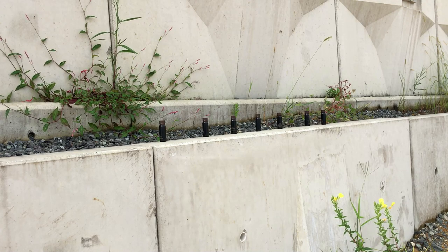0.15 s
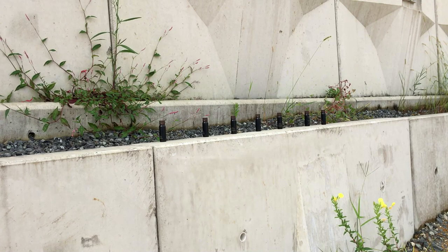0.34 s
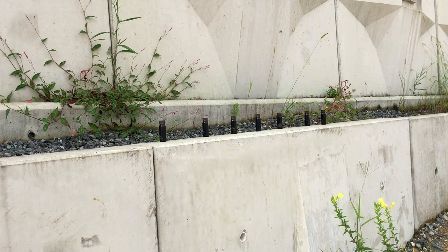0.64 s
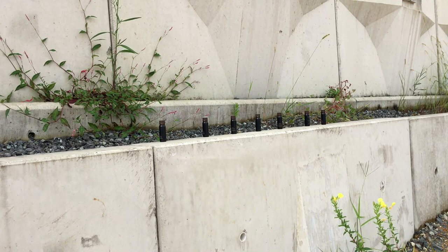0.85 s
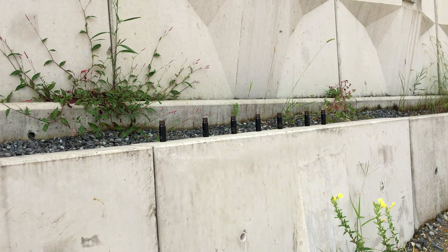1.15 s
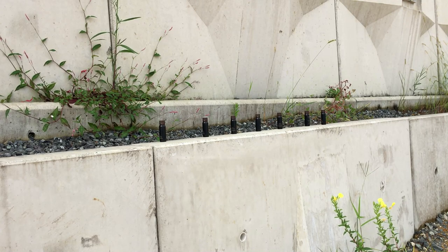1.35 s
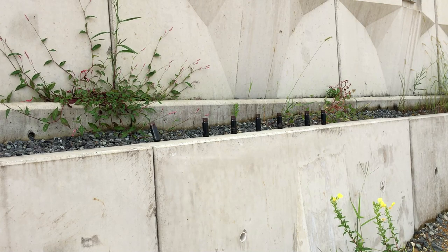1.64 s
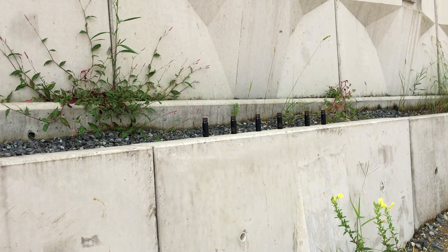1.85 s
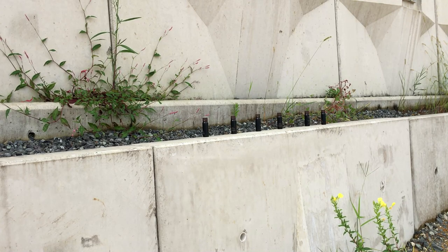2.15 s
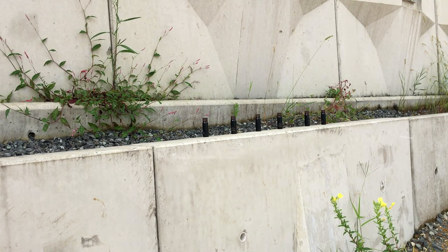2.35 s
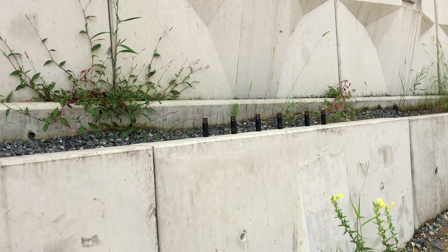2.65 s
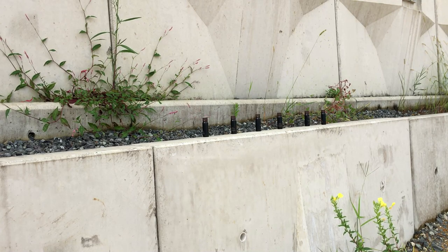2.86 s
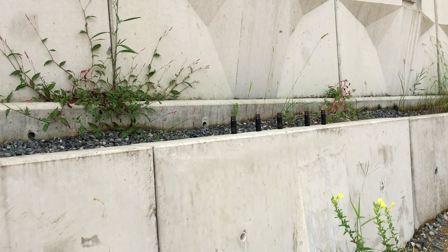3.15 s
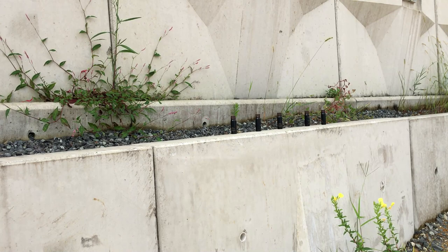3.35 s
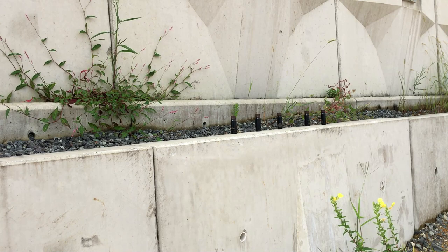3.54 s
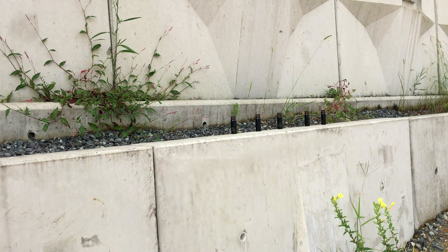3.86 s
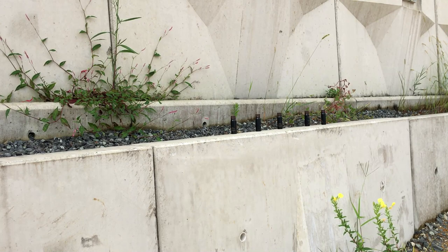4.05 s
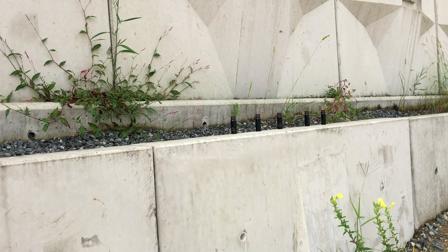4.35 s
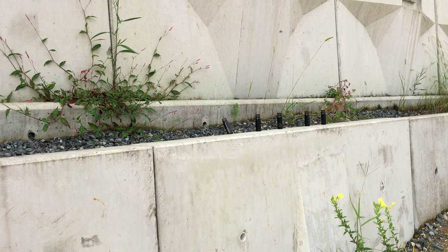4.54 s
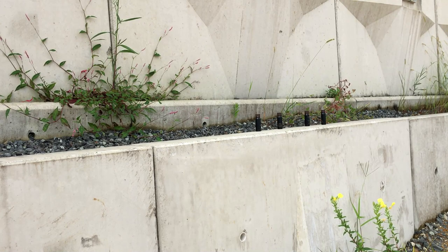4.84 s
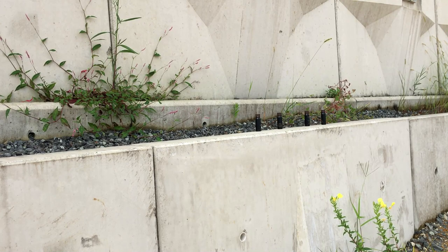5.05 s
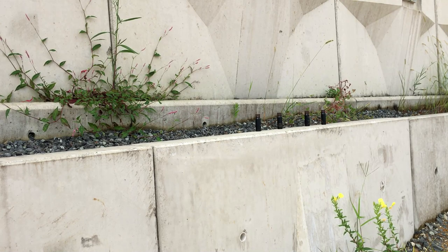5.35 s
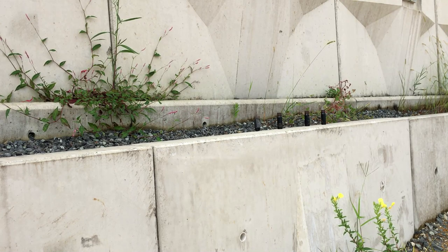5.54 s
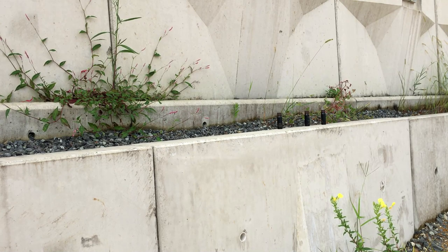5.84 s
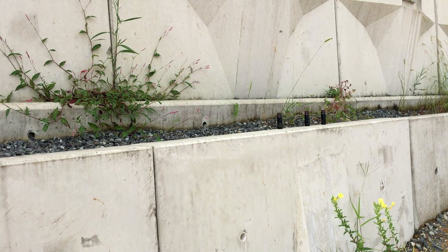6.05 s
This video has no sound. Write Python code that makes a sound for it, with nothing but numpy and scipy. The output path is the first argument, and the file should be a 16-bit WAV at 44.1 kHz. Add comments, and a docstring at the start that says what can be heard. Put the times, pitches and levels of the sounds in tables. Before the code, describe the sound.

An electric airsoft gun fires quick whirring, clacking shots outdoors, its pellets snapping on concrete and knocking small targets into gravel.

```python
"""An electric airsoft gun, some metres off, fires at small targets on a concrete ledge near the microphone.
A target is struck at once, over a low outdoor rumble. In each shot that follows, gears whirr, the piston
slams and the action clacks; about 0.13 s after the slam a BB snaps on concrete or rings a target, which
topples into gravel. Around 2 s a bird trills twice over a distant flock. Near the end a breeze puffs
on the microphone, a bird whistles and the gun fires once more."""
import sys
import numpy as np
from scipy import signal
from scipy.fft import rfft, irfft
from scipy.io import wavfile

SR = 44100
rng = np.random.default_rng(int(sys.argv[2]) if len(sys.argv) > 2 else 0)


def to_wav(s):
    """Save 16-bit WAV."""
    ch = np.atleast_2d(s).T  # columns
    pcm = np.round(np.clip(ch, -1, 1) * 32767)  # PCM
    wavfile.write(sys.argv[1], SR, pcm.astype(np.int16))


N = 273420
T = np.arange(N) / SR

# shots: (time of the slam [s], motor run beforehand [s])
SHOT_TIMES = [(-.069, .05), (.951, .07), (1.2704, .07), (1.5062, .07), (2.387, .048), (2.785, .055),
              (2.985, .052), (3.6408, .06), (4.021, .048), (4.4449, .036), (4.652, .052), (5.2298, .068),
              (5.4358, .056), (6.179, .056)]
# blows within one slam: (delay [s], level [dB], t60 [s])
PISTON_BLOWS = [(.0003, -2.5, 0.057), (.0066, 4, 0.034), (.0095, 4.5, 0.027), (0.0146, 5, 0.053),
                (0.0194, 1.5, .03), (.0255, 1.5, 0.049)]
# spectrum of the slam: (frequency [Hz], level [dB])
PISTON_SPECTRUM = [(100, -38.5), (260, -4.5), (550, -10.5), (1000, -1.5), (1700, -5), (2400, 3), (2950, -7),
                   (3500, 2.5), (5000, -7.5), (6500, -7.5), (7800, -15), (9500, -9), (10500, -20),
                   (12000, -11.5), (16000, -27.5)]
def piston_slams(slam_db=-32.4):
    """Impact excitation: the spring-driven piston slams home in a run of blows, equally hard each shot."""
    slams = [(s, slam_db) for s, _ in SHOT_TIMES]
    return rattle(slams, PISTON_BLOWS, PISTON_SPECTRUM, alike=.87, jitter_s=.0002)


# clacks of the action: (time [s], level [dB])
ACTION_CLACKS = [(0.881, -30.5), (1.204, -29.5), (1.4226, -29.5), (1.687, -30.5), (2.502, -30),
                 (2.9034, -29.5), (3.106, -30.5), (3.7485, -29.5), (4.122, -30.5), (4.566, -30.5),
                 (4.7766, -29.5), (5.3564, -29), (5.562, -31.5)]
# blows within one clack: (delay [s], level [dB], t60 [s])
ACTION_BLOWS = [(.0006, -3, 0.028), (.0035, -3, 0.042), (.0085, 0, .032), (.015, -7, 0.049)]
# spectrum of the clack: (frequency [Hz], level [dB])
ACTION_SPECTRUM = [(100, -5.5), (300, -0.5), (700, -6), (1050, 2.5), (1600, -5), (2400, 6.5), (3600, 8),
                   (5000, -2), (6500, 3), (8000, -10), (12000, -11), (16000, -51)]
def action_clacks(settle_s=.122, settle_db=-24.5):
    """Impact excitation: the action clacks, then sounds again faintly as it settles."""
    settling = [(s + settle_s, db + settle_db) for s, db in ACTION_CLACKS]
    return rattle(ACTION_CLACKS + settling, ACTION_BLOWS, ACTION_SPECTRUM, alike=.42, jitter_s=.0003)


# resonances of the gun's body: (frequency [Hz], width [Hz], lift [dB])
BODY_MODES = [(428.4, 20, 9), (660.5, 32, 11), (901, 29, 5.5), (1073, 34, 4.5), (1185, 75.7, 9.5),
              (1480, 40, 6.5), (1955, 34, 8.5), (2093, 46, 1.5), (2253, 52, 5), (2326, 97, 13),
              (2520, 40, 6), (2730, 40, 4.5), (3152, 78, 8.5), (3415, 70, 4)]
def rattle(events, blows, spectrum, alike, jitter_s):
    """Modal response: blows ring the gun's body; the share `alike` of their energy repeats each time."""
    t, out = T[:SR // 8], np.zeros(N)
    usual_blows = [crack(t, t60) for _, _, t60 in blows]
    for s, db in events:
        for (delay, blow_db, t60), usual in zip(blows, usual_blows):
            blow = np.sqrt(alike) * usual + np.sqrt(1 - alike) * crack(t, t60)
            blow *= np.sqrt(SR * t60 / np.log(1000))  # a longer decay carries more energy
            add(out, s + delay + jitter_s * rng.standard_normal(), undb(db + blow_db) * blow)
    return through(out, response(spectrum, BODY_MODES))


# spectrum of the grinding teeth: (frequency [Hz], level [dB])
GEAR_SPECTRUM = [(150, 11), (500, -7.5), (1100, 10), (1600, 5.5), (2500, 2.5), (4500, 0), (7000, -2),
                 (9000, -9.5), (16000, -24)]
# resonances of the gearbox shell: (frequency [Hz], width [Hz], lift [dB])
GEARBOX_MODES = [(1094, 160, 1.5), (1500, 180, -6.5), (2320, 400, 8), (3220, 180, 7)]
def gears(spin_up_s=.04, run_on_s=.11, gear_db=-46, tooth_hz=490, whine_hz=1800, sag=.35):
    """Gear-mesh noise: teeth collide as the motor winds the spring; its whine sags under the load."""
    t, drive, whine = T[:SR // 4], np.zeros(N), np.zeros(N)
    for s, lead in SHOT_TIMES:
        stop = lead + run_on_s
        running = np.interp(t, [0, spin_up_s, stop - .03, stop], [0, 1, 1, 0])
        roughness = 1 + .15 * rng.standard_normal(len(t))
        hz = whine_hz * (1 - sag * t / t[-1]) * roughness
        add(drive, s - lead, running)
        add(whine, s - lead, running * np.sin(2 * np.pi * np.cumsum(hz) / SR))
    mesh = tooth_hz * T
    tooth_force = undb(2 * rng.standard_normal(N))[mesh.astype(int)]
    teeth = tooth_force * np.exp(-(mesh % 1))
    grind = through(teeth * rng.standard_normal(N), response(GEAR_SPECTRUM, GEARBOX_MODES))
    grind = np.minimum(drive, 1) * grind / grind.std()
    return undb(gear_db) * (grind + undb(-9) * whine * teeth / teeth.mean())


# spectrum of scraping metal: (frequency [Hz], level [dB])
SCRAPE_SPECTRUM = [(300, -33), (1200, 2), (3000, -2), (5000, -5.5), (7000, -6), (10000, -9), (13000, -9),
                   (16000, -17.5)]
def slide(lead_s=.033, t60=.23, below_clack_db=14, catch_hz=700):
    """Stick-slip friction: metal scrapes along its guide up to each clack, and the scrape dies away."""
    push = np.zeros(N)
    for s, db in ACTION_CLACKS:
        rise = np.interp(T - s, [-lead_s, -lead_s / 2], [0, 1])
        push += undb(db - below_clack_db) * rise * fade(np.maximum(T - s, 0), t60)
    catches = undb(3 * rng.standard_normal(N))[(T * catch_hz).astype(int)]
    return push * catches * hiss(SCRAPE_SPECTRUM)


# BBs on concrete: (time [s], level [dB], relative level of the BB's ring [dB])
CONCRETE_HITS = [(1.0809, 1, -9), (1.4002, 0.5, 0.5), (2.516, -7.5, -20), (2.914, 5, -10),
                 (3.771, 3.5, -10), (4.1512, 6.5, -12), (4.7826, -1, -4), (5.365, 2, -6)]
# spectrum of the snap: (frequency [Hz], level [dB])
SNAP_SPECTRUM = [(40, -11.5), (200, 9.5), (450, 10), (1100, 5.5), (2500, 5), (4500, 2.5), (8500, 3),
                 (10400, 1), (12500, 3.5), (16000, -7)]
def concrete_hits(bb_hz=14300, bb_t60=.0013):
    """Acceleration noise: a BB stops dead on concrete, radiating one sharp pulse and a brief high ring."""
    t, out = T[:2048], np.zeros(N)
    for s, db, ring_db in CONCRETE_HITS:
        pulse = response(SNAP_SPECTRUM, tilt_db=2 - .29 * db)  # square hits are fuller than glancing ones
        snap = -pulse + undb(ring_db) * ring(t, bb_hz, bb_t60)
        scatter = undb(-10) * through(crack(t, .022), pulse)
        add(out, s, undb(db) * with_echo(snap + scatter, lag_s=.00093, db=-19))
    return out


WALL_ECHO_S = .0018
# BBs on targets: (time [s], level [dB], tilt [dB/octave],
# low mode [Hz], its weight [dB], high mode [Hz], its weight [dB])
TARGET_STRIKES = [(0.0512, 0, -3.5, 3670, -9.5, 7510, 0), (1.6257, 8.5, 0.2, 4780, -8, 8160, -16),
                  (3.1033, 1.5, 1, 6800, 3.5, 7340, 2), (4.5634, 7, -2.5, 3800, -9.5, 6530, -3),
                  (5.5562, 6.5, -1.7, 3900, -8, 9600, -15)]
# spectrum of a target's shell: (frequency [Hz], level [dB])
SHELL_SPECTRUM = [(80, -24.5), (400, -7.5), (1300, -12), (2500, -16), (5300, -2), (7000, 0.5), (9500, 5),
                  (12000, 3.5), (16000, 5)]
def target_hits(body_t60=.026, mode_t60=.012, column_hz=2200):
    """Free vibration: a BB cracks on a hollow target, ringing two shell modes and its air column."""
    t, out = T[:4096], np.zeros(N)
    for s, db, tilt_db, low_hz, low_db, high_hz, high_db in TARGET_STRIKES:
        shell = response(SHELL_SPECTRUM, tilt_db=tilt_db)
        blow = through(crack(t, t60=.0024), shell)
        body = undb(-7) * through(crack(t, body_t60), shell)
        modes = undb(low_db) * ring(t, low_hz, mode_t60) + undb(high_db) * ring(t, high_hz, mode_t60)
        air_column = undb(-21) * ring(t, column_hz, t60=.035)
        add(out, s, undb(db) * (blow + body + undb(-2) * modes + air_column))
        # the wall just behind returns the crack, partly smeared by the gravel
        smear = undb(-5) * through(crack(t, body_t60), shell)
        add(out, s + WALL_ECHO_S, undb(db - 3) * (blow + smear))
    return out


# landings on gravel: (time [s], level [dB], tilt [dB/octave], ring [Hz], relative ring level [dB])
GRAVEL_DROPS = [(0.096, -19, 4.5, 11400, -11), (.212, -17.5, -1.5, 4380, -7), (1.185, -19, 8, 8800, -12),
                (1.418, -19, 1, 14000, -3), (1.899, -21, -4.5, 3400, -2), (2.928, -17, 9, 13100, -3.5),
                (3.258, -13.5, 1, 3387, 3.5), (3.435, -24.5, -0.5, 3670, -20), (3.586, -27.5, 1, 3970, 0),
                (3.846, -27, 8, 11000, -12), (4.624, -22, 0, 9200, -9), (5.7897, -20.5, 1.5, 4570, -8)]
def gravel_drops():
    """Damped impacts: toppled targets and spent BBs tick on the stones, doubled by the wall behind."""
    t, out = T[:2048], np.zeros(N)
    for s, db, tilt_db, hz, ring_db in GRAVEL_DROPS:
        stone = response([(200, -22), (1500, 6), (4500, -2.5), (9000, 0), (16000, -11)], tilt_db=tilt_db)
        tick = through(crack(t, t60=.018), stone) + undb(ring_db) * ring(t, hz, t60=.01)
        add(out, s, undb(db) * unit(with_echo(tick, WALL_ECHO_S, db=-4)))
    return out


def skitter(grains=2, within_s=.45, mean_db=-36, spread_db=3):
    """Granular settling: after each target is struck, grains of gravel shift with faint ticks."""
    out = np.zeros(N)
    grit = response([(200, -20), (2000, 0), (9000, 0), (16000, -6)])
    for s, *_ in TARGET_STRIKES:
        for when, size in rng.random((grains, 2)):
            tick = through(crack(T[:2048], t60=.012), grit)
            add(out, s + when * within_s, undb(mean_db + spread_db * (2 * size - 1)) * tick)
    return out


def swish(peak_s=4.149, rise_s=.035, ring_hz=3800):
    """Exponential decay: a hiss swells into the hardest hit on concrete and fades, leaving a faint ring."""
    envelope = np.interp(T - peak_s, [-rise_s, 0], [0, 1]) * fade(np.maximum(T - peak_s, 0), t60=.16)
    rush = envelope * hiss([(300, -16), (2000, -1), (4000, 6), (8000, 4.5), (16000, -5)])
    narrow_band = hiss([(300, -30), (ring_hz, 0), (16000, -30)], [(ring_hz, 420, 15)])
    return undb(-32) * rush + undb(-44) * fade(T - peak_s, t60=.28) * narrow_band


def with_echo(x, lag_s, db):
    """Specular reflection: the wall behind the ledge returns a hit a moment later."""
    out = x.copy()
    add(out, lag_s, undb(db) * x)
    return out


def yard(x, dull_t60, bright_t60, bright_db):
    """Reverberation: scattered reflections from concrete walls build into a dull wash and a bright one."""
    t = T[:SR]
    dull = hiss([(100, -23), (1000, 15), (1700, 4.5), (2300, -7.5), (3200, 2.5), (7000, -.5),
                 (16000, -22.5)])
    bright = hiss([(1000, -24), (2400, -21.5), (4000, -2), (6500, -.5), (16000, -8.5)])
    tail = dull[:SR] * fade(t, dull_t60) + undb(bright_db) * bright[:SR] * fade(t, bright_t60)
    build_up = 1 - fade(t, .012)
    return through(x, unit(tail * build_up))


# trills: (time [s], mean level of the last note [dB])
BIRD_TRILLS = [(1.836, -50), (2.157, -49.5)]
# pitch of a trill note: (start [Hz], middle [Hz], end [Hz])
NOTE_GLIDE = (4200, 3890, 3600)
# arched whistle: (time [s], length [s], start [Hz], middle [Hz], end [Hz], mean level [dB])
BIRD_WHISTLES = [(5.906, 0.068, 3950, 4470, 4270, -56)]
def near_bird(note_every_s=.019, note_s=.0172, rise_db=3):
    """Amplitude modulation: two four-note trills, each growing louder, and a whistle flutter in level."""
    song = np.zeros(N)
    for s, last_db in BIRD_TRILLS:
        for note in range(4):
            db = last_db - (3 - note) * rise_db
            add(song, s + note * note_every_s, undb(db) * chirp(note_s, *NOTE_GLIDE))
    for s, length_s, *glide, db in BIRD_WHISTLES:
        add(song, s, undb(db) * chirp(length_s, *glide))
    return song * wander(turns_per_s=300, depth_db=2.5)


def flock(centre_hz=3880, spread=.17, calls=900, twitter_db=-68.5):
    """Incoherent summation: many distant falling chirps, blurred by the walls, merge into a twitter."""
    chirps = np.zeros(N)
    for when, pitch, size in rng.random((calls, 3)):
        hz = centre_hz * (1 + spread * (pitch - .5))
        add(chirps, when * N / SR, size * chirp(.018, hz * 1.06, hz, hz * .94, overtone_db=-30))
    twitter = through(chirps, crack(T[:SR // 4], t60=.26))
    return undb(twitter_db) * wander(turns_per_s=5, depth_db=2) * twitter / twitter.std()


def chirp(length_s, start_hz, middle_hz, end_hz, overtone_db=-20):
    """Frequency modulation: a whistle with two weak overtones glides along a parabola."""
    progress = np.linspace(0, 1, int(length_s * SR))
    hz = np.polyval(np.polyfit([0, .5, 1], [start_hz, middle_hz, end_hz], 2), progress)
    phase = 2 * np.pi * np.cumsum(hz) / SR
    return np.sin(np.pi * progress) * sum(undb(overtone_db * k) * np.sin((k + 1) * phase) for k in range(3))


# swell of the drone: (peak time [s], half length [s], level [dB])
DRONE_PEAK = (4.39, 0.15, -50.5)
def far_drone(hz=197, steady_db=-60.5):
    """Narrow-band noise: a far drone holds one rough pitch and swells once."""
    band = hiss([(60, -25), (hz, 0), (600, -35), (16000, -100)], [(hz, 45, 16)])
    return (undb(steady_db) + swell(*DRONE_PEAK)) * band


# puffs of breeze: (peak time [s], half length [s], level [dB])
PUFFS = [(5.29, 0.11, -43.5), (5.484, 0.087, -39.5), (5.767, 0.015, -38.5), (6.008, 0.1, -41)]
def breeze():
    """Turbulent pressure: puffs of air on the microphone make a deep flutter."""
    flutter = hiss([(15, -33), (30, -6.5), (60, 1), (130, -5.5), (220, -25), (600, -45.5), (16000, -100)])
    return sum(swell(*puff) for puff in PUFFS) * flutter


# spectra of the rumble and of the distant wash: (frequency [Hz], level [dB])
RUMBLE_SPECTRUM = [(15, -39.5), (30, -9.5), (57, -0.5), (100, -7), (160, -17.5), (300, -31.5), (800, -73),
                   (16000, -100)]
WASH_SPECTRUM = [(60, -8.5), (150, -4), (200, -0.5), (240, -1.5), (330, -2.5), (500, -8), (1000, -14),
                 (2000, -18.5), (3000, -25.5), (4000, -28), (6300, -30), (8000, -38.5), (12000, -42),
                 (16000, -47)]
def open_air(rumble_db=-51.5, wash_db=-54):
    """Stationary noise: a low outdoor rumble lies under a soft wash of distant sound."""
    return undb(rumble_db) * hiss(RUMBLE_SPECTRUM) + undb(wash_db) * hiss(WASH_SPECTRUM)


def undb(db):
    """Logarithmic level: decibels to amplitude gain."""
    return 10 ** (np.asarray(db) / 20)


def unit(x):
    """Normalisation to an energy of one."""
    return x / np.sqrt(np.sum(x ** 2))


def add(track, s, sound):
    """Superposition: mix a sound into a track at time s."""
    i = int(round(s * SR))
    sound, i = sound[max(-i, 0):], max(i, 0)
    track[i:i + len(sound)] += sound[:max(len(track) - i, 0)]


def fade(t, t60):
    """Exponential decay from t = 0, falling 60 dB in t60 seconds."""
    return (t >= 0) * np.exp(-np.log(1000) * np.maximum(t, 0) / t60)


def swell(s, half_s, db):
    """Gaussian envelope that peaks at time s."""
    return undb(db) * np.exp(-((T - s) / half_s) ** 2)


def wander(turns_per_s, depth_db):
    """Random modulation: a gain that drifts from one level to the next."""
    turns = np.arange(0, T[-1] + 1, 1 / turns_per_s)
    return undb(depth_db * np.interp(T, turns, rng.standard_normal(len(turns))))


def ring(t, hz, t60):
    """Damped oscillation of one struck mode, energy one."""
    return unit(np.sin(2 * np.pi * hz * t) * fade(t, t60))


def crack(t, t60):
    """Modal overlap: dense modes as decaying noise evened out to a flat spectrum, energy one."""
    burst = rng.standard_normal(len(t)) * fade(t, t60)
    for _ in range(2):
        spectrum = rfft(burst)
        burst = irfft(spectrum / (abs(spectrum) + 1e-12), len(t)) * fade(t, 10 * t60)
    return unit(burst)


def response(spectrum, peaks=(), tilt_db=0, size=4096):
    """Minimum-phase impulse response with resonances and a treble tilt per octave, energy one."""
    hz = np.maximum(np.fft.rfftfreq(size, 1 / SR), 1)
    points, levels = np.transpose(spectrum)
    db = np.interp(np.log(hz), np.log(points), levels) + tilt_db * np.log2(np.maximum(hz, 1200))
    for centre, width, lift in peaks:
        db = db + lift / (1 + (2 * (hz - centre) / width) ** 2)
    cepstrum = irfft(np.log(undb(db)))
    causal = irfft(np.exp(rfft(2 * cepstrum[:size // 2], size)))[:size // 2]
    return unit(causal * signal.windows.tukey(size, .5)[size // 2:])


def through(x, ir):
    """Convolution of a sound with an impulse response."""
    return signal.fftconvolve(x, ir)[:len(x)]


def hiss(spectrum, peaks=()):
    """Spectral shaping of white noise, rms about one."""
    return through(rng.standard_normal(N), response(spectrum, peaks))


def scene():
    """Superposition of the distant gun, the close impacts, their reverberation and the background."""
    gun = piston_slams() + action_clacks() + gears() + slide()
    impacts = concrete_hits() + target_hits() + gravel_drops() + skitter() + swish()
    gun_echo = undb(-26) * yard(gun, dull_t60=.73, bright_t60=.77, bright_db=-1.5)
    impact_echo = undb(-23.5) * yard(impacts, dull_t60=.25, bright_t60=.13, bright_db=10)
    background = far_drone() + breeze() + open_air() + flock() + near_bird()
    return (gun + impacts + gun_echo + impact_echo + background)[None]


def record(dry):
    """Saturation and band limiting: the microphone rounds off the hardest cracks and cuts the top treble."""
    ceiling, top_hz = .7, 15900
    low_pass = signal.ellip(8, .2, 70, top_hz, fs=SR, output="sos")
    return signal.sosfilt(low_pass, ceiling * np.tanh(dry / ceiling))


dry = scene()
out = record(dry)
to_wav(out)
```